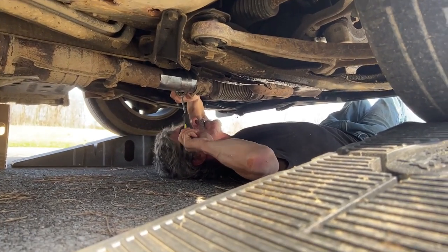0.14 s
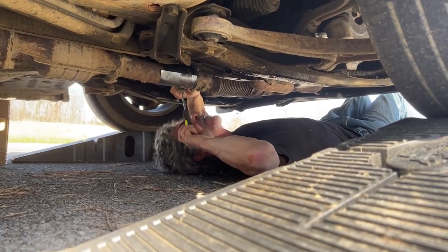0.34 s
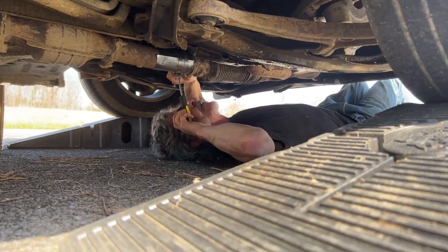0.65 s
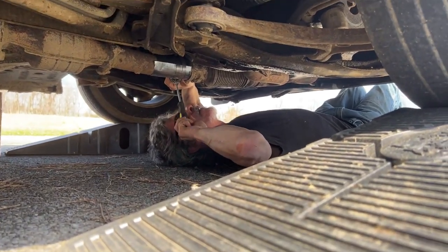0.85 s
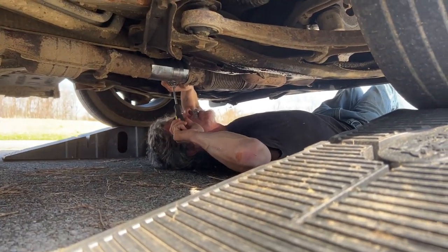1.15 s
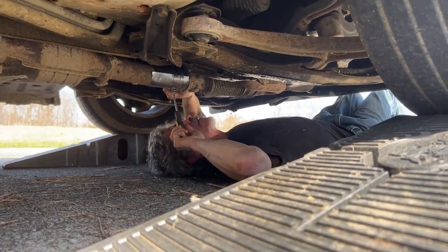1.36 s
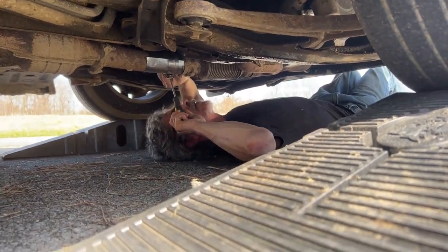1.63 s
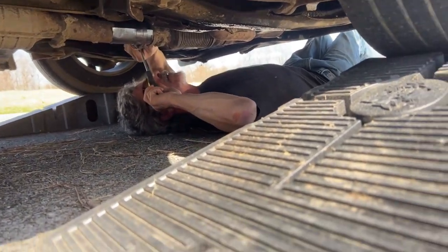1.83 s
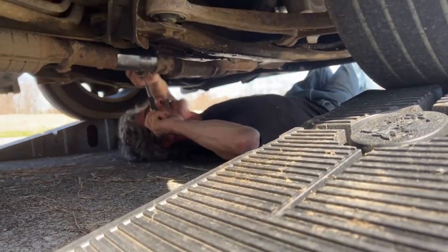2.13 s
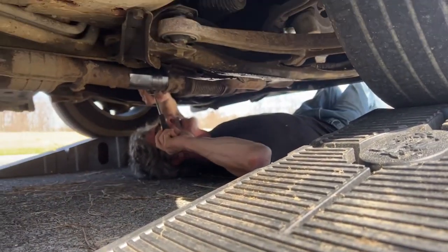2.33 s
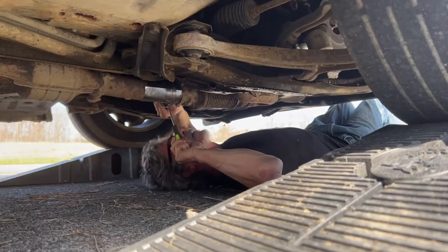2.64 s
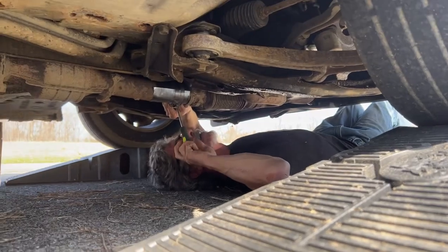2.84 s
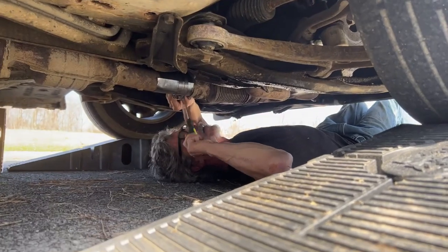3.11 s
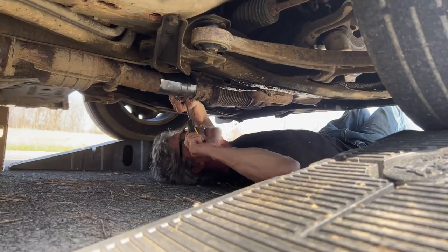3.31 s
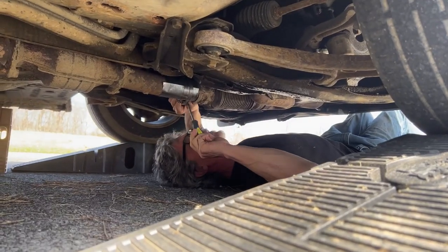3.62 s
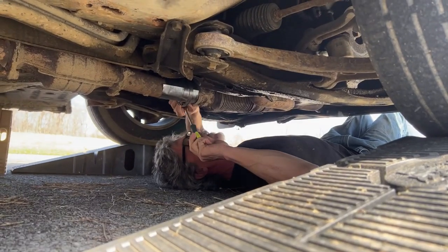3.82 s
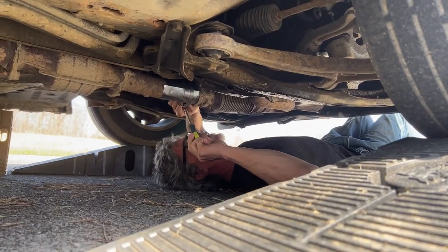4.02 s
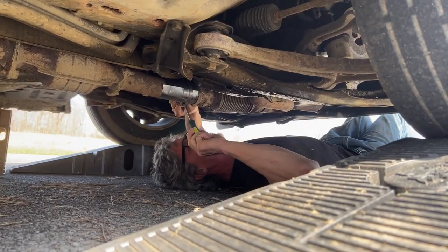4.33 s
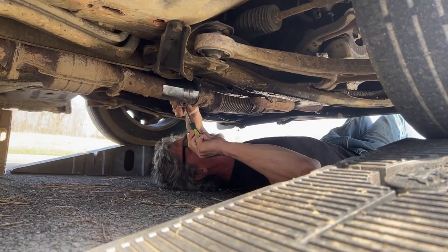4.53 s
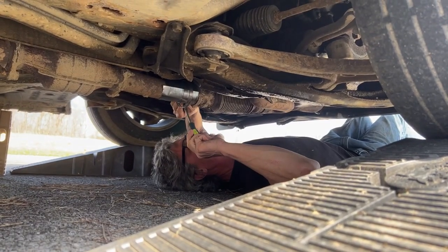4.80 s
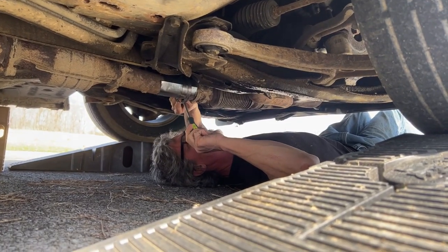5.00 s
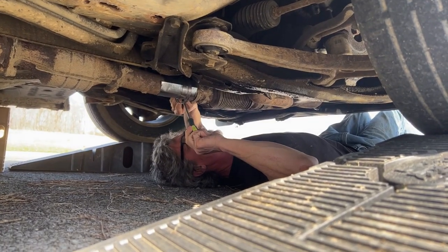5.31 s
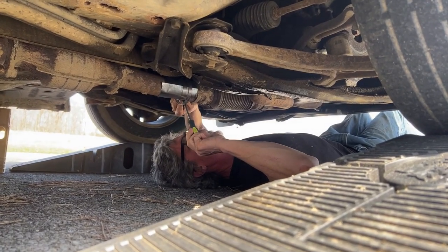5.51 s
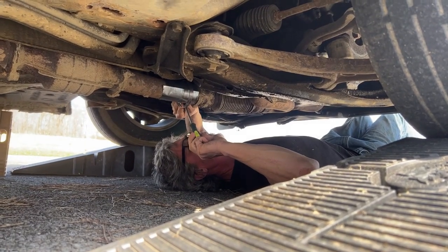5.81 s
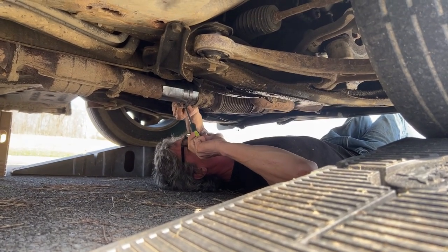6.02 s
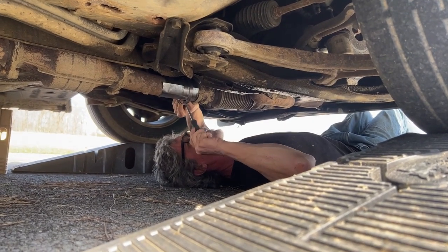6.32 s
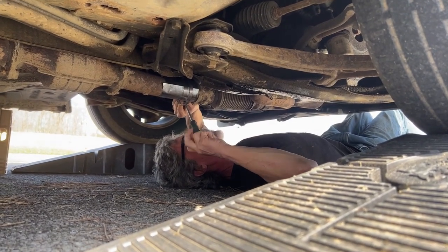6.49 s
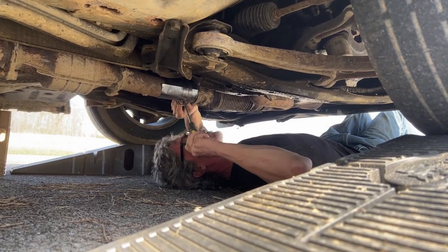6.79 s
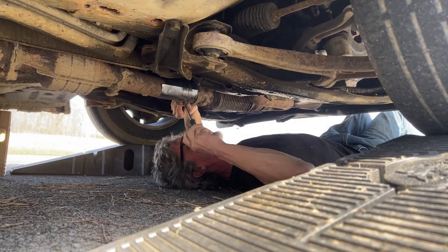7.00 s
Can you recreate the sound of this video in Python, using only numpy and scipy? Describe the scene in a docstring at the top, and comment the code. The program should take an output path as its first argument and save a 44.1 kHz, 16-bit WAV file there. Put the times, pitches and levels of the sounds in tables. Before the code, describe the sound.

Outdoors beneath a parked vehicle, a hand tool's steel jaws click and rasp lightly on a rusted exhaust pipe at uneven intervals. Just after three seconds the metal gives with a loud, sharp clink and a brief, duller rebound. Crisper clicks follow, then thin out. Low distant traffic swells slowly behind, with a tiny far bird chirp. A close single microphone hears short reflections between floor and asphalt.

```python
"""A hand tool works on a rusted exhaust pipe under a parked car: its jaws click (impact noise shaped by
the steel's resonances) and scrape (noise in dense random grains). Once the metal gives with a sharp
clink: a crack of noise and a sum of decaying pipe modes. Sound scatters between the floor pan and the
asphalt, as convolution with fading noise. Distant traffic, filtered noise, slowly swells, and a far
bird chirps faintly in falling sine sweeps."""
import sys
import numpy as np
from scipy import signal
from scipy.fft import rfft, irfft, next_fast_len
from scipy.io import wavfile
from scipy.ndimage import uniform_filter1d

SR = 44100
rng = np.random.default_rng(int(sys.argv[2]) if len(sys.argv) > 2 else 0)


def persist_wave(psi):
    """Save psi, clipped to +-1, as 16-bit WAV."""
    counts = np.round(np.clip(psi, -1, 1) * 32767).astype(np.int16)
    wavfile.write(sys.argv[1], SR, np.atleast_2d(counts).T)


N = 315315
TIME = np.arange(N) / SR  # the whole scene (s)
HIT = np.arange(SR // 2) / SR  # the longest single impact (s)

# strokes of the jaws over rust: start t/s, length t/s, level/dB, tilt above 1 kHz/(dB per octave)
RUST_STROKES = [(-.028, 0.13, -48.5, -2), (.383, 0.13, -46.5, -4.5), (0.791, 0.12, -51, -13.5),
                (1.02, 0.14, -60, 0), (1.332, 0.28, -71.5, 5.5), (1.68, .26, -54, -.5),
                (1.95, .1, -70.5, 3), (2.05, 0.17, -61, -1.5), (2.165, .33, -60, -2.5),
                (2.63, 0.12, -52.5, 1), (2.753, 0.17, -67.5, 7.5), (3.082, 0.13, -55.5, 4.5),
                (3.128, 0.067, -38.5, 1), (3.24, .13, -49, -2), (3.297, 0.041, -44, 2.5),
                (3.47, .17, -56, -4), (3.782, 0.2, -65.5, .5), (5.462, 0.16, -67, 4),
                (5.863, 0.2, -69.5, -1), (6.17, 0.32, -67.5, 4.5), (6.682, 0.15, -54, -4),
                (6.791, .13, -56.5, -1.5)]
# resonances of the tool's steel: f/Hz, width f/Hz, peak level/dB
TOOL_STEEL = [(2090, 30, 0.5), (2770, 45, 9.5), (3000, 94, 6), (4320, 140, 7.5), (5440, 110, 3.5),
              (6250, 270, 1.5), (7200, 200, 2.5), (8760, 110, 2.5), (12260, 200, 2)]
# spectrum of steel jaws on metal: f/Hz, level/dB
CLACK_SPECTRUM = [(800, -50.5), (1750, -5.5), (2250, 1), (3500, -2), (4800, 0), (7000, -5.5), (9500, -19),
                  (15000, -48.5)]


def amp(db):
    """Level to amplitude: 20 dB is a factor of ten."""
    return 10 ** (np.asarray(db) / 20)


def unit(x):
    """Normalization: the signal at rms 1."""
    return x / np.sqrt(np.mean(x ** 2) + 1e-20)


def along(points, hz):
    """Logarithmic interpolation: (f/Hz, value) points read on a log frequency axis."""
    f, v = np.transpose(points)
    return np.interp(np.log(hz + 1), np.log(f + 1), v)


def filtered(x, response):
    """Linear filtering: the spectrum of x times a response of frequency, zero-padded."""
    size = next_fast_len(len(x) + len(x) // 20, real=True)
    spectrum = rfft(x, size) * response(np.fft.rfftfreq(size, 1 / SR))
    return irfft(spectrum, size)[:len(x)]


def colour(x, spectrum, peaks=()):
    """Source and resonator: x given a spectrum and Lorentzian peaks that add power, at rms 1."""
    def response(f):
        power = 1 + sum(amp(db) ** 2 / (1 + (2 * (f - centre) / width) ** 2) for centre, width, db in peaks)
        return amp(along(spectrum, f)) * np.sqrt(power)
    return unit(filtered(x, response))


def noise(size, spectrum, peaks=()):
    """Coloured noise: white Gaussian noise through a spectrum, at rms 1."""
    return colour(rng.standard_normal(size), spectrum, peaks)


def flutter(rate, size):
    """Random modulation: straight lines between Gaussian knots, rate knots a second."""
    knots = rng.standard_normal(int(size * rate / SR) + 2)
    return np.interp(np.arange(size) * rate / SR, np.arange(len(knots)), knots)


def fade(t, t60, rise, hold=0):
    """Damping: exponential build-up, a short hold, then decay by 60 dB in t60 seconds."""
    attack = 1 - np.exp(-t / max(rise, 1e-5))
    decay = np.exp(-np.log(1000) * np.maximum(t - hold, 0) / max(t60, 1e-3))
    return attack * decay


def add(track, s, sound):
    """Superposition: a sound is summed into the track from time s."""
    start = round(s * SR)
    sound, start = sound[max(-start, 0):], max(start, 0)
    track[start:start + len(sound)] += sound[:N - start]


def underbody():
    """Diffuse reverberation: noise that decays at a different rate in each band, energy 1."""
    # decay times of the space under the car: f/Hz, t60 t/s
    decay_times = [(250, 1), (1200, 0.37), (3000, 0.34), (6000, 0.26), (15000, .25)]
    hz, t, bands = signal.stft(rng.standard_normal(len(HIT)), SR, nperseg=256)
    decay = np.exp(-np.log(1000) * t / along(decay_times, hz)[:, None])
    tail = signal.istft(bands * decay, SR, nperseg=256)[1]
    return tail / np.linalg.norm(tail)


def echoed(x, wet_db):
    """Convolution with an impulse response: x with the scattering under the car added."""
    return x + amp(wet_db) * signal.oaconvolve(x, underbody())[:N]


def patchy(x, patchy_db):
    """Turbulent scintillation: moving air makes a far sound swell and fade in patches of time and pitch."""
    bands = signal.stft(x, nperseg=2048)[2]
    field = uniform_filter1d(rng.standard_normal(bands.shape), size=3, axis=0)
    field = uniform_filter1d(field, size=7, axis=1)
    return unit(signal.istft(bands * amp(patchy_db * unit(field)), nperseg=2048)[1][:N])


def outdoors():
    """Cavity resonance: far traffic noise booms in the hollow under the car, over a thin hiss of air."""
    # resonances of the hollow: f/Hz, width f/Hz, peak level/dB
    hollow_modes = [(92.5, 9, 3), (119, 10, 4.5), (163.5, 6.1, 5), (349, 12, -11), (732, 48, -0.5),
                    (932.5, 19, 9.5), (1281, 70, 6)]
    # spectra of low rumble, tyre rush and air: f/Hz, level/dB
    rumble_spectrum = [(20, -51.5), (31, -39.5), (42, -10), (62, 0.5), (110, -2.5), (170, -4.5), (230, -8),
                       (330, -18.5), (700, -50.5), (2000, -120)]
    tyre_spectrum = [(100, -59), (200, -22.5), (280, 4), (480, 0.5), (780, 3), (1050, -3), (1350, -5),
                     (1600, -10), (2200, -16.5), (3200, -27), (6000, -48), (12000, -100)]
    air_spectrum = [(500, -11), (2000, 0), (4000, -1), (7000, -3), (10000, -4), (13000, -11), (14200, -20),
                    (15500, -34)]
    # course of the tyre rush, before a lift of 1.2 dB: t/s, level/dB
    tyre_course = [(0.0, -59), (0.59, -63.5), (2.59, -62.5), (3.34, -57.5), (3.76, -59), (4.3, -56.5),
                   (5.28, -60.5), (6.39, -56.5), (7.15, -56.5)]

    rumble_db = -59 + 0.78 * TIME + 1.3 * flutter(9, N)  # swells by 0.78 dB a second
    rumble = amp(rumble_db) * noise(N, rumble_spectrum, hollow_modes)
    tyres = patchy(noise(N, tyre_spectrum, hollow_modes), patchy_db=2.5)
    rush_db = np.interp(TIME, *np.transpose(tyre_course)) + 1.2 + 1.0 * flutter(6, N)
    air = amp(-81.5) * noise(N, air_spectrum)
    return rumble + amp(rush_db) * tyres + air


def bird():
    """Frequency modulation: thin falling chirps from far away, broken up by the paths they take."""
    # chirps: t/s, length t/s, start f/Hz, end f/Hz, level/dB
    far_chirps = [(2.746, 0.049, 4350, 3283, -70), (2.859, 0.05, 4300, 3380, -72.5)]
    out = np.zeros(N)
    for s, length, start_hz, end_hz, db in far_chirps:
        u = np.minimum(HIT / length, 1)
        pitch = start_hz + (end_hz - start_hz) * u + 180 * flutter(700, len(HIT))
        envelope = amp(db + 3 * flutter(212, len(HIT))) * np.sin(np.pi * u)
        add(out, s, envelope * np.sin(2 * np.pi * np.cumsum(pitch) / SR))
    return echoed(out, wet_db=-5)


def steel(scatter_db):
    """Modal excitation: the tool's resonances, at new strengths for each grip and contact."""
    strengths = rng.standard_normal(len(TOOL_STEEL))
    return [(hz, width, db + scatter_db * z) for (hz, width, db), z in zip(TOOL_STEEL, strengths)]


def scrapes():
    """Friction over asperities: the jaws drag over rust in dense grains of uneven size."""
    # spectrum of the rust before each stroke's tilt: f/Hz, level/dB
    rust_spectrum = [(150, -25), (290, 1), (550, 1), (1200, 2.5), (1800, -0.5), (2600, -1), (4400, -4.5),
                     (6500, -8.5), (10000, -9.5), (15500, -18)]
    grains_per_s, grain_decay_s = 350, 0.0098  # time constant of a grain's power
    press_share, release_db = 0.24, 21  # pressing in, as a share of the stroke; easing off by its end
    judder_db, judder_per_s = 1, 55  # the jaws catch and slip along the way

    out, t = np.zeros(N), TIME[:SR]
    for s, length, db, tilt_db in RUST_STROKES:
        sizes = amp(5.6 * np.minimum(rng.exponential(size=len(t)), 4))
        grains = (rng.random(len(t)) < grains_per_s / SR) * sizes
        grain_power = signal.lfilter([1], [1, -np.exp(-1 / (grain_decay_s * SR))], grains)
        grit = np.sqrt(grain_power) * rng.standard_normal(len(t))
        tilted = [(hz, level + tilt_db * np.log2(max(hz / 1e3, 1))) for hz, level in rust_spectrum]
        rasp = colour(grit, tilted, steel(scatter_db=1))
        u = t / length
        release = np.maximum(u - press_share, 0) / (1 - press_share)
        pressure = np.minimum(u / press_share, 1) * amp(-release_db * release)
        add(out, s, amp(db + judder_db * flutter(judder_per_s, len(t))) * rasp * pressure)
    return echoed(out, wet_db=-15.5)


def pipe_ring(corner_hz, rise, favoured_hz, scatter_db):
    """Modal synthesis: a soft contact reaches only the pipe's low modes, and the spot struck favours one."""
    # modes of the exhaust pipe: f/Hz, level/dB, t60 t/s
    pipe_modes = [(279, -21, 0.34), (358, -29.5, 0.45), (575, -24.5, 0.23), (720, -25, .15),
                  (940, -21.5, 0.21), (1018, -24, .25), (1250, -17.5, 0.18), (1378, -23, 0.46),
                  (1589, -17, 0.2), (1640, -17.5, .15), (2230, -15.5, .07), (2790, -5.5, 0.11),
                  (2990, -22.5, .24), (3517, -5, 0.064), (3620, 3, 0.069), (3750, 3, .07),
                  (3690, -5.5, 0.065), (4482, -3, 0.076), (4690, -1, 0.11), (4836, -0.5, .07),
                  (5230, -2, 0.026), (5140, -3.5, 0.11), (5905, 0.5, 0.0501), (6380, -14.5, 0.074),
                  (7400, -11.5, 0.076), (8460, -12.5, .055), (9970, -18, .09), (11100, -17, 0.11),
                  (13350, -19.5, 0.056)]
    ring = np.zeros(len(HIT))
    for (hz, db, t60), (size, phase) in zip(pipe_modes, rng.standard_normal((len(pipe_modes), 2))):
        favour_db = 9 * np.exp(-(np.log(hz / favoured_hz) / 0.067) ** 2)
        gain = amp(db + favour_db + scatter_db * size) / np.hypot(1, (hz / corner_hz) ** 2)
        ring += gain * fade(HIT, t60, rise) * np.sin(2 * np.pi * (hz * HIT + phase))
    return ring


def clink():
    """Impulsive release: the metal gives with a crack, then the pipe rebounds and settles in duller blows."""
    # blows: t/s, level/dB, contact corner f/Hz, crack level/dB, ring level/dB, favoured mode f/Hz
    pipe_blows = [(3.158, -21, 13700, -1, -0.5, 2290), (3.175, -37, 12020, 0.5, -11.5, 2797),
                  (3.186, -26, 1744, 7.5, -0.5, 937), (3.204, -47, 6070, -2.5, -13.5, 368),
                  (3.266, -28, 653, -4, 7.5, 570)]
    # spectrum of the cracking metal: f/Hz, level/dB
    crack_spectrum = [(150, -30.5), (290, -16.5), (700, -18.5), (1400, -6.5), (1900, -16.5), (2350, -3),
                      (5000, -1), (6800, -11), (10000, -12), (15500, -18)]
    out = np.zeros(N)
    for s, db, corner_hz, crack_db, ring_db, favoured_hz in pipe_blows:
        rise = 0.0048 * (1e3 / corner_hz) ** 0.45  # seconds; harder blows rise faster
        crack = noise(len(HIT), crack_spectrum) * fade(HIT, t60=0.077, rise=rise, hold=0.0049)
        lowpass = signal.butter(2, min(corner_hz, SR / 2 - 1), fs=SR, output="sos")
        crack = signal.sosfilt(lowpass, crack)
        ring = pipe_ring(corner_hz, rise, favoured_hz, scatter_db=0.5)
        ring *= amp(2.0 * flutter(160, len(HIT)))  # the loose joint shakes, so the ring is unsteady
        add(out, s, amp(db) * (amp(crack_db) * crack + amp(ring_db) * ring))
    return echoed(out, wet_db=-17)


def snags():
    """Random point process: strokes snag faintly on flakes of rust; rows like those of the clicks."""
    per_s, level_db, spread_db, edge_db, ring_hz = 4, -72.5, 2.5, 2, 5300
    rows = []
    for s, length, _, _ in RUST_STROKES:
        for chance, place, size in rng.random((4, 3)):
            if chance < per_s * length / 4:  # four tries a stroke
                rows.append((s + place * length, level_db + spread_db * (2 * size - 1), edge_db, ring_hz))
    return rows


def spot(count):
    """Local resonance: narrow peaks of one spot on the rusted metal, as (f/Hz, width f/Hz, level/dB)."""
    low_hz, high_hz, width_hz, peak_db = 2213, 13000, 110, 10.5
    places = (np.arange(count) + rng.random(count)) / count
    return [(low_hz * (high_hz / low_hz) ** u, width_hz, peak_db) for u in places]


def knock_level(edge_db):
    """Contact stiffness: the softer the contact, the more of it goes into the low knock (dB)."""
    return -14 - 0.6116 * edge_db


def click(db, edge_db, ring_hz):
    """Hertzian impact: hardness sets the rise, decay and brightness of noise coloured by the tool's steel."""
    # spectra of the low knock and the bright edge: f/Hz, level/dB
    knock_spectrum = [(120, -30), (270, -3.5), (420, 4.5), (560, -8), (800, 3.5), (1250, 0.5), (1700, 1),
                      (2600, -20), (5000, -75)]
    edge_spectrum = [(3500, -43), (6500, -6), (8500, -2), (11000, -3.5), (13500, -4.5), (15500, -8)]
    t = HIT[:SR // 5]
    # seconds at an edge of 0 dB; softer contacts rise more slowly and last longer
    rise = 0.0012 * 2 ** (-edge_db / 27.5)
    t60 = 0.087 * 2 ** (-edge_db / 46)
    # every point of contact brings out one resonance above the rest
    modes = steel(scatter_db=2.0) + spot(count=9) + [(ring_hz, 170, 12)]

    clack = amp(1.0) * noise(len(t), CLACK_SPECTRUM, modes) * fade(t, t60, rise, hold=0.008)
    # the strongest resonance outlasts the clack
    after_ring = amp(-15 + 3 * flutter(120, len(t))) * np.sin(2 * np.pi * ring_hz * t)
    after_ring *= fade(t, 0.2, rise)
    knock = noise(len(t), knock_spectrum) * fade(t, 2.5 * t60, rise=0.0018, hold=0.006)
    knock *= amp(knock_level(edge_db))
    edge = amp(edge_db + 3) * noise(len(t), edge_spectrum, modes)
    edge *= fade(t, 0.6 * t60, rise / 2, hold=0.0038)
    # after the first contact the jaws skip over rust
    chatter = amp(2.2 * np.minimum(t / 0.067, 1) * flutter(300, len(t)))
    return amp(db) * (clack + after_ring + knock + edge) * chatter


def clicks():
    """Impact and structural response: the jaws bite with a click, led in by a short rising hiss; the pipe answers."""
    # bites of the jaws: t/s, level/dB, edge (hardness; the bright edge gets 3 dB more)/dB, strongest ring f/Hz
    jaw_bites = [(0.184, -54, -19.5, 2660), (0.361, -46.5, -17, 4430), (0.593, -65, -19, 4400),
                 (0.672, -71, -17, 4050), (0.766, -46.5, -16.5, 3040), (0.795, -45, -6.5, 4310),
                 (1.048, -56.5, -9, 2960), (1.3124, -62, 3, 5470), (1.4926, -43.5, -1, 3100),
                 (1.699, -59, -2, 2567), (1.886, -76.5, 15, 6910), (2.174, -65, -6, 3030),
                 (2.594, -53.5, -5, 4060), (2.644, -54.5, -1, 3890), (2.997, -43, -4.5, 4200),
                 (3.126, -44.5, -6.5, 2740), (3.138, -40, -7, 4300), (3.4008, -34.5, -2.5, 2770),
                 (3.4326, -50, -6, 3000), (3.617, -58.5, -13, 2980), (3.658, -34, -3.5, 2720),
                 (3.899, -40, -4, 2760), (4.2136, -40, -5.5, 6220), (4.2431, -42.5, 0.5, 4440),
                 (4.305, -52, -3, 3900), (4.6005, -45.5, -0.5, 8800), (4.92, -64.5, -10, 3510),
                 (4.97, -47, -9, 2810), (5.11, -50.5, -7, 3120), (5.595, -47, -4, 4440),
                 (5.668, -45.5, -5, 2800), (6.197, -66.5, 3.5, 5230), (6.3275, -55.5, 5.5, 5440),
                 (6.6119, -45.5, -10.5, 2580), (6.881, -71, -1, 4400), (6.9233, -62.5, 2, 5330),
                 (6.984, -62.5, -12, 2990), (7.068, -70, -6, 3000)]
    lead_s, lead_db = 0.011, -14.5  # the rising hiss before each click: its length, its level against the click
    out, taps = np.zeros(N), np.zeros(N)
    ring = pipe_ring(corner_hz=1796, rise=0.00197, favoured_hz=275.8, scatter_db=4.0)
    t = HIT[:SR // 20]
    for s, db, edge_db, ring_hz in jaw_bites:
        lead = noise(len(t), CLACK_SPECTRUM, TOOL_STEEL) * (t / lead_s) * (t < lead_s)
        add(out, s - lead_s, amp(db + lead_db) * lead)
        add(out, s, click(db, edge_db, ring_hz))
        taps[round(s * SR)] = amp(db + knock_level(edge_db))
    for s, db, edge_db, ring_hz in snags():
        add(out, s, click(db, edge_db, ring_hz))
    answer = amp(5) * signal.oaconvolve(taps, ring)[:N]
    return echoed(out + answer, wet_db=-17.5)


def scene():
    """Superposition: the pressures of all sources add at one microphone."""
    return (outdoors() + bird() + scrapes() + clink() + clicks())[None]


def record(dry):
    """Band limitation: the microphone chain keeps nothing from 16 kHz up."""
    return np.array([filtered(x, lambda hz: hz < 16000) for x in dry])


dry = scene()
out = record(dry)
persist_wave(out)
```